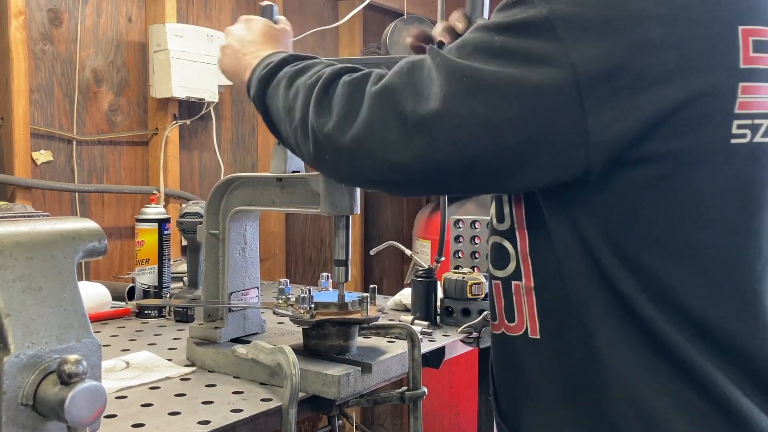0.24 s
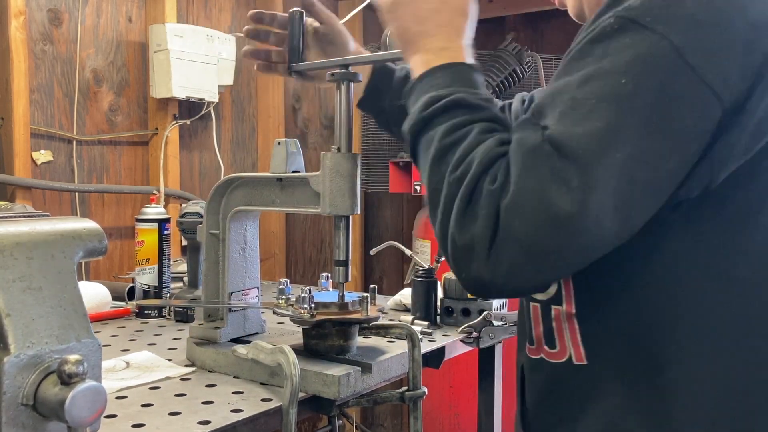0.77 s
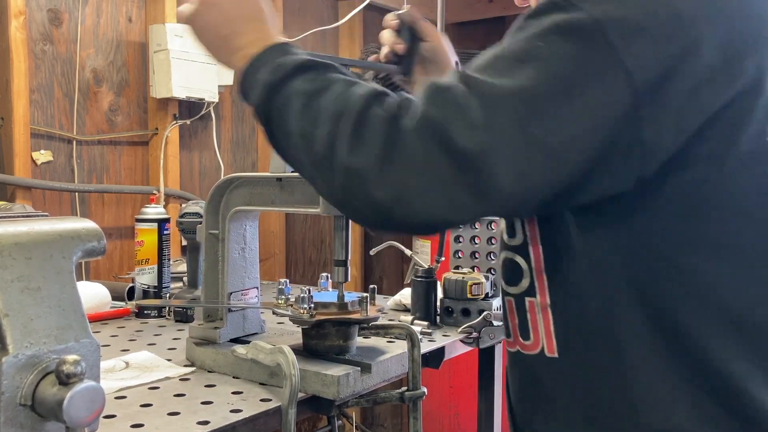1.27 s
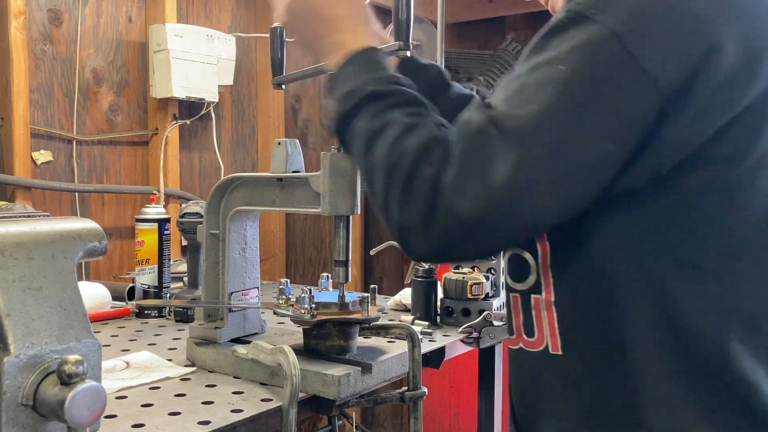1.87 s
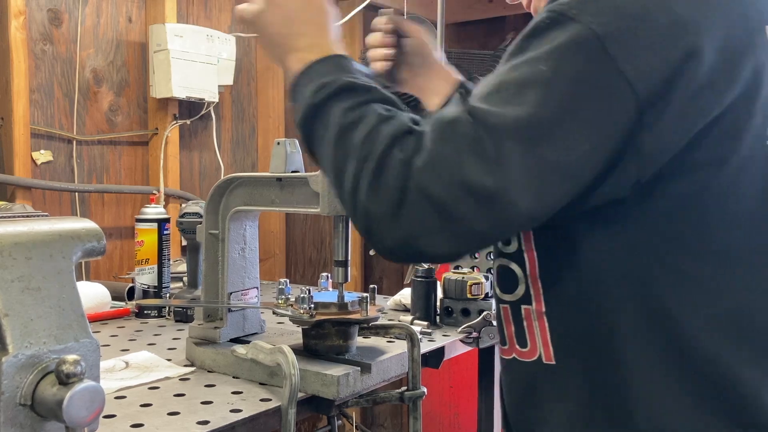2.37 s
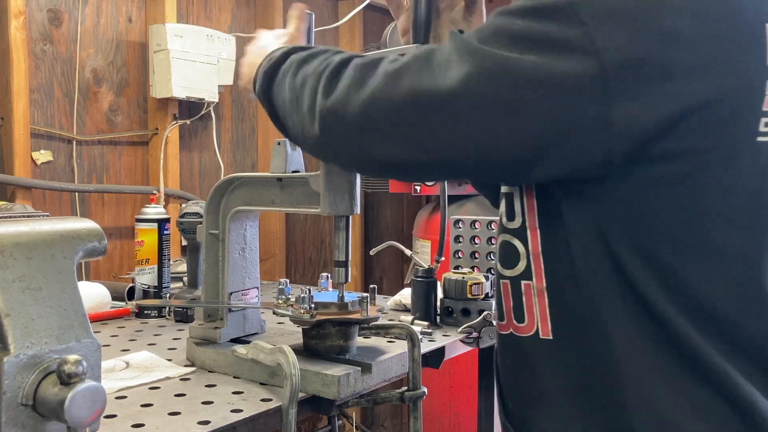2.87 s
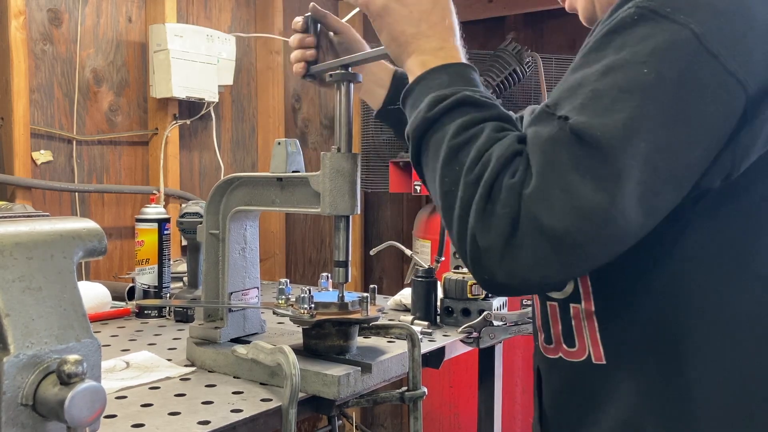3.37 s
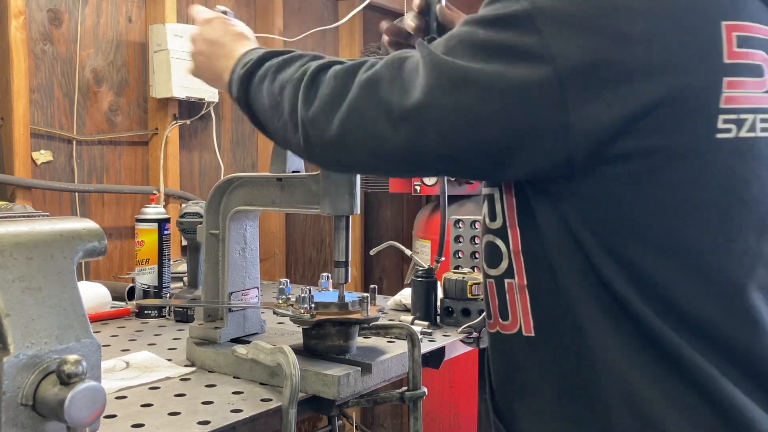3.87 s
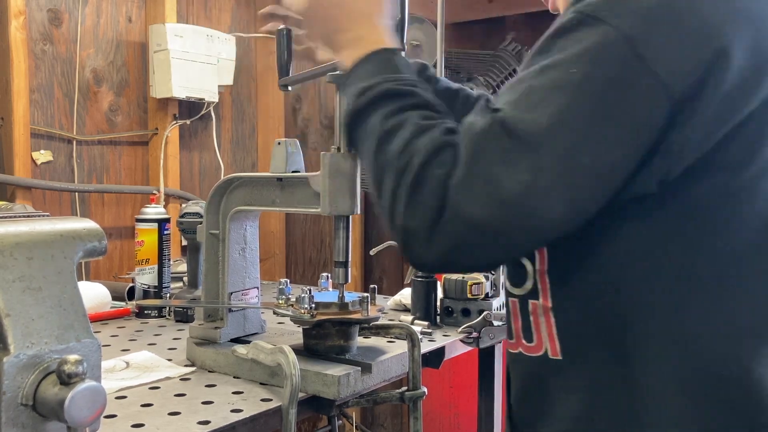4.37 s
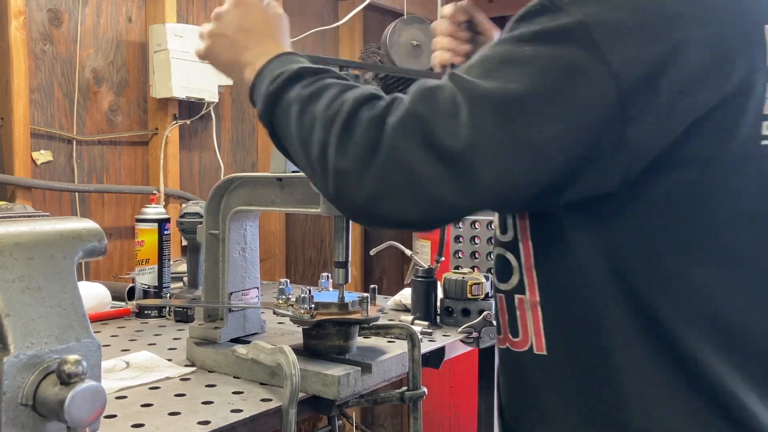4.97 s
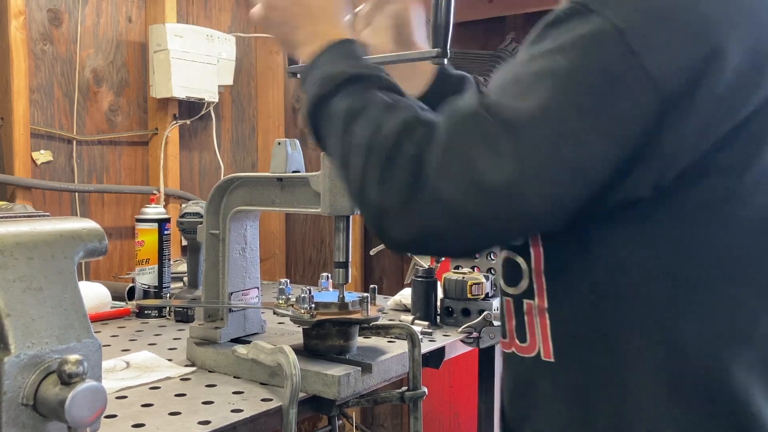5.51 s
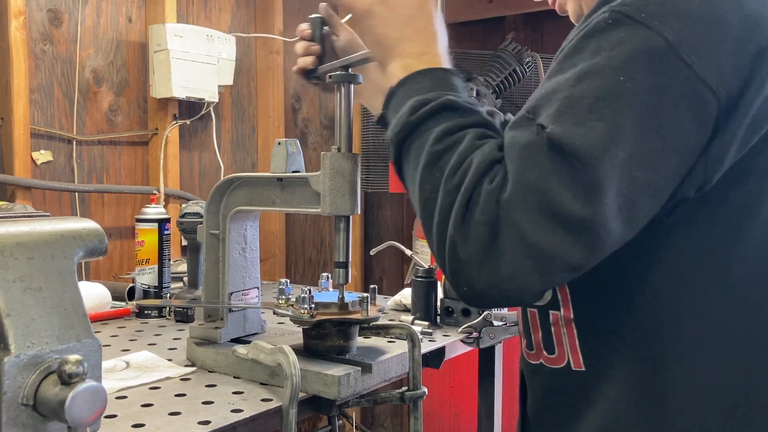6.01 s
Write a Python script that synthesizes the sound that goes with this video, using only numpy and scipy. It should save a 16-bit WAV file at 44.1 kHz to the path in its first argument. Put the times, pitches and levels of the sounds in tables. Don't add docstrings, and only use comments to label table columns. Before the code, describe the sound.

Irregular metallic clacks in a quiet small timber workshop: a light knock first, then a much harder one at about two seconds, a long stretch of little ticks and faint rubbing, a bright hard double knock past four and a half seconds, and a medium knock near the end. Each has a snappy attack, short iron ring and quick boxy echo. Low rumble and thin hiss stay underneath, heard on a nearby phone in stereo.

```python
import sys
import numpy as np
from scipy import signal
from scipy.fft import rfft, irfft, next_fast_len
from scipy.io import wavfile
from scipy.ndimage import uniform_filter1d

SR = 44100
rng = np.random.default_rng(int(sys.argv[2]) if len(sys.argv) > 2 else 0)


def field_ratio(decibels):
    return 10 ** (np.asarray(decibels, dtype=float) / 20)


def pcm_store(signal):
    levels = np.round(np.clip(np.atleast_2d(signal), -1, 1) * 32767)
    wavfile.write(sys.argv[1], SR, levels.astype(np.int16).T)


N = 275625
SIZE = next_fast_len(N + SR)
HZ = np.maximum(np.arange(SIZE // 2 + 1) * SR / SIZE, 1)
PULSE_T = np.arange(1024) / SR
PORT_DELAY_S = 1e-3


def jig():
    snap, drive = knocks()
    ring = through(drive, rfft(frame(), SIZE))
    near, far = ticks()
    to_walls = field_ratio(-13.0) * snap + field_ratio(-40.5) * ring[0] + field_ratio(-9) * far
    echoes = through(to_walls, rfft(room(), SIZE))
    direct = field_ratio(15) * snap + field_ratio(-5.5) * ring + field_ratio(19.0) * near
    return through(direct + echoes, ports(lead_s=0.00011, left_db=4))


# (start_s, force_db near 2 kHz, thud_db, snap_db, frame_ring_db)
KNOCKS = [
    (0.9574, -35, 2, -0.5, -7),
    (0.9707, -46.5, 12.5, -4, 0.5),
    (2.143, -17, -5.5, 3, 2.5),
    (4.6334, -19, -2.5, 5, 3.5),
    (4.644, -19.5, -7, -24, 3),
    (5.8727, -25, -3.5, -2.5, -4.5),
]


def knocks():
    snap, drive = np.zeros((2, N + SR))
    grits = rng.standard_normal((len(KNOCKS), len(PULSE_T)))
    for (s, force, thud, bright, ring_db), grit in zip(KNOCKS, grits):
        levels = force, thud, bright, bright - 1.85
        crack = blow(*levels, grit, chatter_s=0.0059, chatter_db=-9.0, top_db=-11, valley_db=0)
        push = blow(*levels, grit, chatter_s=0.002, chatter_db=-26, top_db=-16, valley_db=2)
        add(snap, s, crack)
        add(drive, s, field_ratio(ring_db) * push)
    return snap[:N], drive[:N]


BLOW_HZ = (1050, 2000, 4800, 11500)


def blow(force, thud, snap, sizzle, grit, chatter_s, chatter_db, top_db, valley_db, bass_db=-14):
    levels = force + np.array([thud + 4, 0, snap - 5, sizzle - 8])
    colour = [(300, levels[0] + bass_db), *zip(BLOW_HZ, levels), (15000, levels[3] + top_db)]
    colour.insert(4, (7600, min(levels[2:]) + valley_db))
    hit = (PULSE_T == 0) + field_ratio(chatter_db) * grit * np.exp(-PULSE_T / chatter_s)
    return np.convolve(hit, contact(colour))


def contact(db_points, size=512):
    hz = np.maximum(np.arange(size // 2 + 1) * SR / size, 20)
    cepstrum = irfft(np.log(field_ratio(on_hz(db_points, hz))), size)
    cepstrum[1:size // 2] *= 2
    cepstrum[size // 2 + 1:] = 0
    return irfft(np.exp(rfft(cepstrum)), size)


FRAME_HZ = (415, 560, 655, 785, 840, 1000, 1075, 1165, 1335, 1430, 1595, 1755, 1875, 1958, 2250, 2600, 3150,
            3430, 3690, 4190, 4600, 4830, 5090, 5290, 6900, 7900, 8250, 10400, 11400)
# (level_db, t60_s)
FRAME = [(-6, .2), (-20.5, 0.045), (-12, 0.16), (-11, 0.065), (-18, 0.086), (-7.5, 0.17), (-9, 0.19),
         (-7.5, 0.19), (-13, 0.094), (-7, 0.27), (-6.5, 0.087), (-13.5, .09), (-2, .13), (2, 0.11),
         (-9, 0.052), (-18.5, 0.064), (-25.5, 0.039), (-22.5, .08), (-11, 0.28), (-17.5, 0.047),
         (-21, 0.11), (-13, .12), (-7.5, 0.18), (-18, 0.08), (-15.5, 0.035), (-10.5, .04), (6, 0.026),
         (-9, 0.057), (-22, 0.044)]


def frame(scatter=0.75, partner_db=-10, spread_s=0.001):
    t = np.arange(SR // 3) / SR
    db, t60 = np.repeat(FRAME, 3, axis=0).T[:, :, None]
    place = np.tile([0, -1, 1], len(FRAME))[:, None]
    hz = np.repeat(FRAME_HZ, 3)[:, None] * (1 + place * rng.uniform(0.008, 0.025, db.shape))
    phase = scatter * rng.standard_normal((len(hz), 2))
    t60 = np.clip(t60, 0.01, np.where(hz < 1800, 0.14, 0.29))
    fade = field_ratio(db + partner_db * abs(place)) * np.exp(-np.log(1000) * t / t60)
    fade = fade * (1 - np.exp(-t / spread_s))
    return np.array([np.sum(fade * np.sin(2 * np.pi * hz * t + phase[:, [port]]), axis=0) for port in range(2)])


# (start_s, force_db near 2 kHz, thud_db, snap_db, sizzle_db)
TICKS = [
    (0.7799, -40.5, 0, -7, -4.5),
    (0.8095, -46.5, -20, -4.5, -6),
    (1.9693, -45, -3, -1.5, 10.5),
    (3.2201, -38, -10, -4, -8),
    (4.4321, -42.5, 1, -4.5, 4),
    (4.594, -46, 5.5, 5, -3.5),
    (5.681, -47.5, 2, 2, 0.5),
    (5.7683, -40, -12, -6.5, 0),
]
# (start_s, force_db near 2 kHz, thud_db, treble_db)
TAPS = [(0.4765, -49.5, -2.5, -12), (0.5546, -49.5, -6, -17.5), (0.616, -52, -2, -24),
        (0.8454, -55, 5, -4.5), (1.1442, -55, -14, -16), (1.639, -41, -10, -25),
        (1.7564, -47.5, -2.5, -14.5), (2.1342, -35.5, 5, -11.5), (2.709, -48.5, 3.5, -28),
        (2.7365, -59, -1, -24), (4.2035, -51, -9, -20), (4.52, -48.5, -6, -20), (5.441, -47.5, -10.5, -16),
        (5.5556, -51.5, -1.5, -23)]
CLICKS = [
    (0.5245, -54, -15, -12.5, 1),
    (1.0027, -31.5, -16, -14, -10),
    (1.6311, -43, 0.5, -6.5, 0),
    (1.989, -55, 4, 9, -0.5),
    (3.271, -48.5, 8, 9, 10.5),
    (5.2705, -54, 1.5, -26, -22),
    (5.8057, -45, 5, 10.5, 4.5),
]
GLINTS = [
    (.918, -75, -6, 6, 17),
    (.940, -75, -6, 6, 17),
]


def ticks(handle_hz=5300, handle_db=-43, t60=0.05):
    near, far = np.zeros((2, N + SR))
    handle_ring = np.sin(2 * np.pi * handle_hz * PULSE_T) * np.exp(-np.log(1000) * PULSE_T / t60)
    handle = (PULSE_T == 0) + field_ratio(handle_db) * handle_ring
    # crispness, direct sound over echo in dB
    hidden = [(*row, -5) for row in TICKS]
    taps = [(*row, row[-1] + 6.5, -2) for row in TAPS]
    clicks = [(*row, 4.5) for row in CLICKS]
    glints = [(*row, 4.5) for row in GLINTS]
    rows = sorted(hidden + taps + clicks) + glints
    for (s, *levels, crisp_db), grit in zip(rows, rng.standard_normal((len(rows), len(PULSE_T)))):
        touch = blow(*levels, grit, chatter_s=0.0026, chatter_db=-9.5, top_db=1, valley_db=-6)
        pulse = np.convolve(touch, handle)
        add(near, s, field_ratio(crisp_db) * pulse)
        add(far, s, pulse)
    return near[:N], far[:N]


# (pitch_hz, t60_s, level_db)
ROOM = [(293, 1, -5), (610, 0.9, 4.5), (1050, 0.26, 0.5), (2130, 0.4, -5), (4417, 0.25, 0.5),
        (8000, 0.17, -4.5), (11900, 0.044, -16)]


def room(build_cycles=5, alike_hz=900):
    t = np.arange(SR * 3 // 4) / SR
    tail = 0
    for hz, t60, db in ROOM:
        t60 = min(t60, 0.34)
        edges = [hz / np.sqrt(2), min(hz * np.sqrt(2), 0.45 * SR)]
        band = signal.butter(2, edges, "band", fs=SR, output="sos")
        mid, side = signal.sosfilt(band, rng.standard_normal((2, len(t))))
        pair = mid + min(hz / alike_hz, 1) * side * np.array([[1], [-1]])
        build = 1 - np.exp(-t * hz / build_cycles)
        tail = tail + field_ratio(db) * pair * np.exp(-np.log(1000) * t / t60) * build
    return tail


# (pitch_hz, level_db per Hz)
RUB_COLOUR = [(760, -33), (1300, -17), (1920, -12.5), (2890, -26), (3880, -17), (5370, -26.5),
              (7830, -16.5), (9270, -22.5), (9560, -18.5), (10500, -12), (13700, -20.5), (14700, -13.5),
              (16000, -23.5)]
# (pitch_hz, width_hz, level_db)
GUIDE = [(686, 96, 1.5), (1057.5, 120, 6), (1306, 380, -5.5), (1990, 990, -8.5)]
# (pitch_hz, likeness 0-1)
LIKENESS = [(60, 0.94), (290, 0.96), (640, 0.2), (1400, 0.6), (3000, .05), (15000, 0)]


def spindle():
    hiss_gain, hum_gain = pulls()
    like = on_hz(LIKENESS)
    hiss_colour = field_ratio(on_hz(RUB_COLOUR)) * (HZ > 1300)
    hiss = noise(hiss_colour, like) * flicker(20, 1.5) * flicker(200, 2.5)
    body = sum(field_ratio(db) / (1 + (2 * (HZ - hz) / width) ** 2) for hz, width, db in GUIDE)
    hum = noise(body, like) * flicker(25, 2.2) * flicker(150, 2.2)
    return field_ratio(6.0) * (hiss_gain * hiss + hum_gain * hum)


# (start_s, length_s, hiss_db, hum_db)
PULLS = [
    (-0.15, 0.55, -76.5, -72),
    (1.128, 0.63, -74, -70.5),
    (2.275, 0.48, -74.5, -68),
    (3.548, .52, -74.5, -71),
    (4.797, .5, -76, -75.5),
    (6.006, 0.39, -82.5, -76.5),
]


def pulls():
    t = np.arange(N) / SR
    rise_s, fall_s = 0.11, 0.086
    load_db = 2.5
    after_hum_db, after_hum_t60_s = -32.5, 0.7
    hiss, hum = field_ratio(-86), field_ratio(-80)
    for s, length, hiss_db, hum_db in PULLS:
        rising = (t - s) / rise_s
        falling = 1 + (s + length - t - fall_s) / fall_s
        speed = np.clip(np.minimum(rising, falling), 0, 1)
        load = ((t - s) / length - 0.5).clip(-1, 1)
        hiss = hiss + field_ratio(hiss_db) * speed
        hum = hum + field_ratio(hum_db + load_db * load) * speed
    for s, force, *_ in KNOCKS:
        fade = np.exp(-np.log(1000) * np.abs(t - s) / after_hum_t60_s) * (t > s)
        hum = hum + field_ratio(force + after_hum_db) * fade
    return hiss, hum


# (pitch_hz, level_db per Hz)
RUMBLE = [(20, -30), (30, -10), (40, -7), (62, 1), (82, 2.5), (120, -4), (170, -6.5), (285, -13.5),
          (590, -20.5), (900, -28), (2080, -46.5), (4500, -53), (7500, -54.5), (14700, -45.5)]
# (start_s, level_db)
RUMBLE_SWELL = [(0.0, -53.5), (1.9, -52.5), (2.25, -48.5), (3.12, -55.5), (3.5, -50.5), (4.3, -50),
                (6.25, -53)]


def building():
    swell_db, = on_time(RUMBLE_SWELL)
    gain = field_ratio(-51 + swell_db - np.mean(swell_db))
    rumble = noise(field_ratio(on_hz(RUMBLE)), on_hz(LIKENESS)) * gain
    return through(rumble, ports(lead_s=9e-5, left_db=0.18))


def on_hz(table, hz=HZ):
    points = np.array(table, float)
    return np.interp(np.log(hz), np.log(points[:, 0]), points[:, 1])


def on_time(table):
    s, *columns = np.transpose(table)
    return [np.interp(np.arange(N) / SR, s, c) for c in columns]


def through(x, response):
    return irfft(rfft(x, SIZE) * response, SIZE)[..., :N]


def ports(lead_s, left_db):
    side = np.array([[0.5], [-0.5]])
    louder = field_ratio(left_db * side / (1 + np.log2(HZ / 1900) ** 2))
    return louder * np.exp(2j * np.pi * HZ * (lead_s * side - PORT_DELAY_S))


def noise(gain, like):
    mid, side = rfft(rng.standard_normal((2, SIZE)))
    like = np.clip(like, -1, 1)
    pair = np.sqrt(1 + like) * mid + np.sqrt(1 - like) * side * np.array([[1], [-1]])
    x = irfft(pair * gain, SIZE)[:, :N]
    return x / np.sqrt(np.mean(x ** 2))


def flicker(rate_hz, spread_db):
    k = int(SR / rate_hz)
    steps = np.repeat(rng.standard_normal(N // k + 1), k)
    walk = uniform_filter1d(uniform_filter1d(steps, k), k)[:N]
    return field_ratio(spread_db * walk)


def add(track, s, pulse):
    at = int((s - PORT_DELAY_S) * SR)
    track[at:at + len(pulse)] += pulse


def scene():
    return jig() + spindle() + building()


def low_pass(x):
    return signal.sosfilt(signal.butter(12, 16560, fs=SR, output="sos"), x)


# (pitch_hz, half_width_hz, level_db)
MICROPHONE = [(9050, 620, -22), (13700, 500, -22), (5650, 200, -5), (16400, 800, -22)]


def record(dry):
    dips_db = sum(db / (1 + ((HZ - hz) / width) ** 8) for hz, width, db in MICROPHONE)
    top = 1 / (1 + (HZ / 16400) ** 80)
    return low_pass(through(dry, field_ratio(dips_db) * top))


dry = scene()
out = record(dry)
pcm_store(out)
```